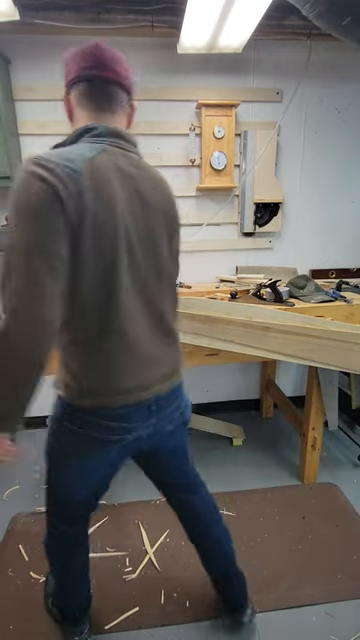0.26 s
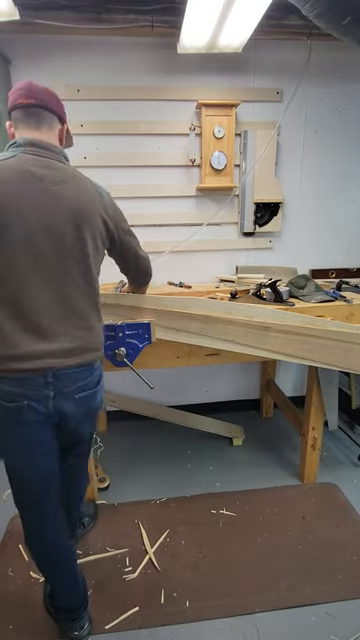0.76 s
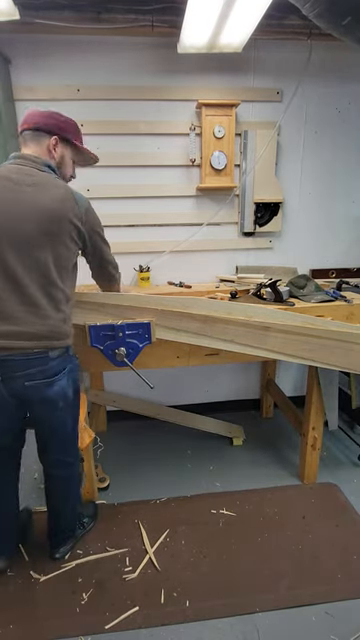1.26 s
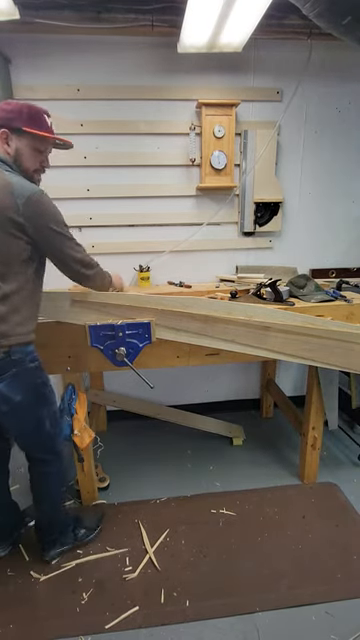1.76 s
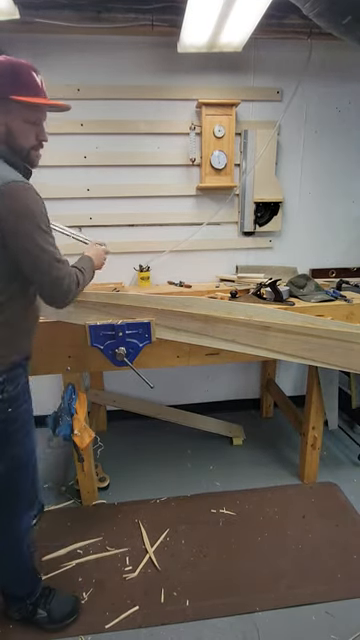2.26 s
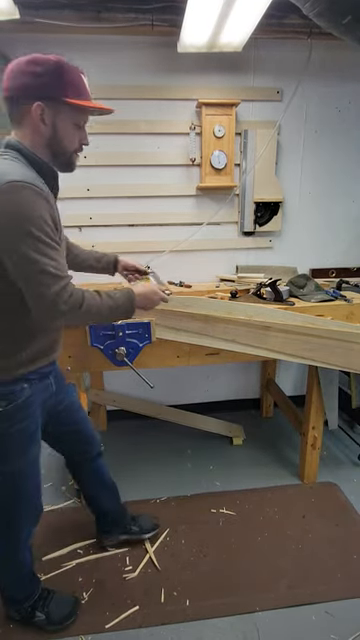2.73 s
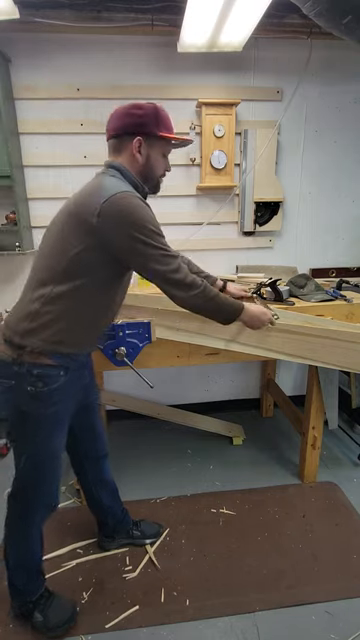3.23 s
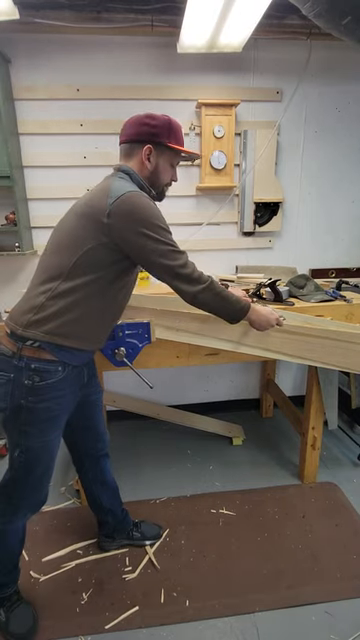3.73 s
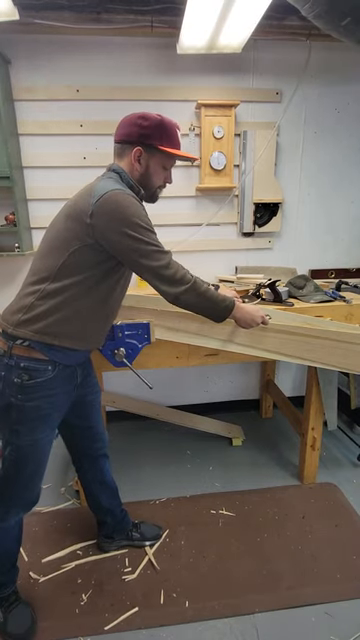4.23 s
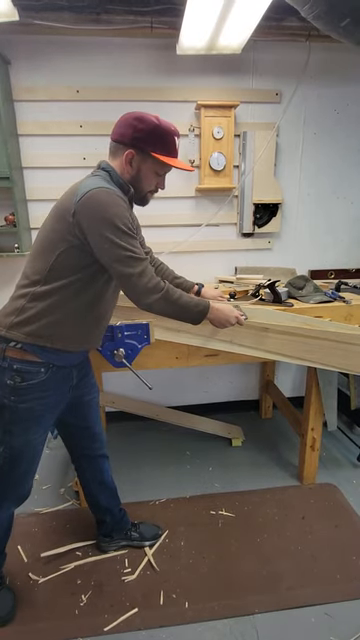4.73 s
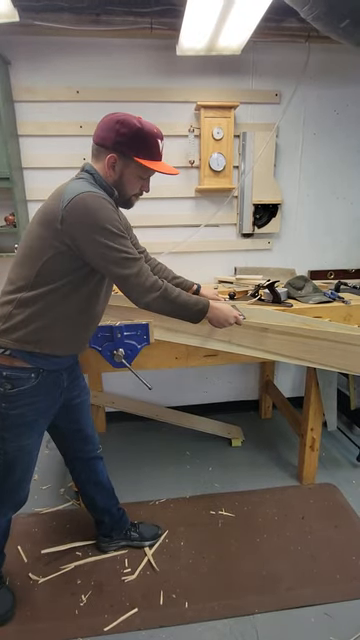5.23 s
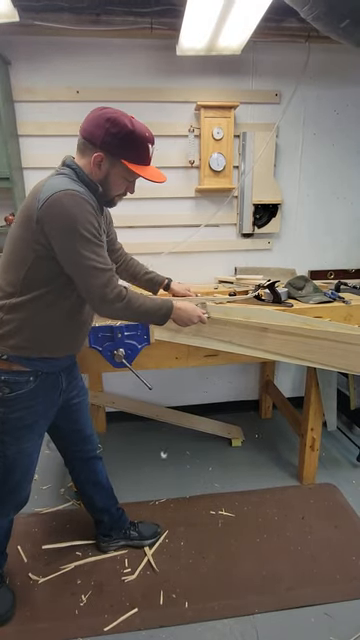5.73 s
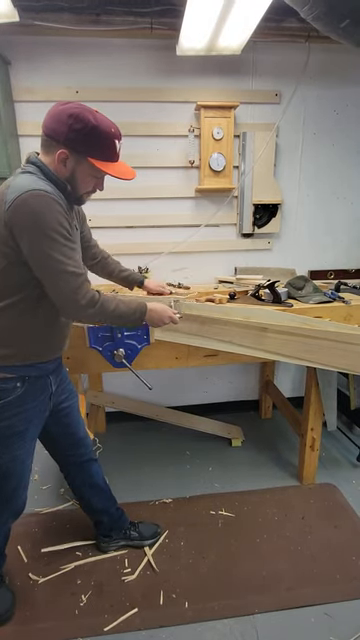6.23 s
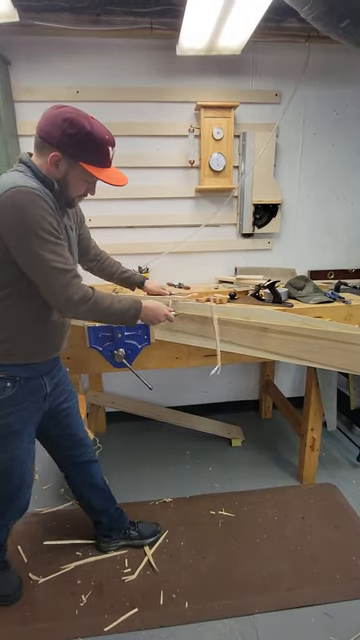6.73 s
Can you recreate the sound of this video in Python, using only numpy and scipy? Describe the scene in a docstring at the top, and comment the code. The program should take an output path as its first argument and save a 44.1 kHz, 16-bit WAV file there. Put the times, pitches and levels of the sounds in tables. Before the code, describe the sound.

A fan rushes faintly in a small workshop, heard from a couple of metres away. Shoes scuff on a mat and a tool knocks hard on the wooden bench. Then a blade shaves a board in seven quick, rasping strokes, the last four louder. Shavings split with crisp cracks and the board resonates, with faint rubbing and light taps as the blade goes back for each cut.

```python
"""A small woodshop, heard from a phone's two microphones a couple of metres off the bench: mostly room.
A woodworker steps up, picks up a drawknife with a knock and pulls seven strokes along a clamped board.
Each stroke is a dense run of tearing fibres with a few sharp splits, and the board drums under it.
Between strokes the blade slides back and is set down with a clack. A fan rushes and hums throughout."""
import sys
import numpy as np
from scipy import signal
from scipy.fft import rfft, irfft
from scipy.io import wavfile

SR = 44100
rng = np.random.default_rng(int(sys.argv[2]) if len(sys.argv) > 2 else 0)


def inscribe(sig):
    """Save sig as 16-bit PCM at rate SR to the path in sys.argv[1].

    A 1-D sig is mono; a 2-D sig holds one channel per row.
    Samples are clipped to [-1, 1] before scaling.
    """
    pcm = np.round(np.clip(np.atleast_2d(sig).T, -1, 1) * 32767)
    wavfile.write(sys.argv[1], SR, pcm.astype(np.int16))


N = 307818
T = np.arange(N) / SR

# Levels are relative within each table; the functions set the balance.
# pulls of the knife: t/s, attack/s, hold/s, tearing level/dB, swell over the hold/dB, drumming level/dB
KNIFE_PULLS = [(3.737, .17, 0.084, -38, 1, -40.5), (4.252, 0.027, 0.016, -30, -2.5, -33.5),
               (4.557, 0.084, 0.16, -30.5, 5.5, -38), (5.31, .017, 0.042, -19, -1.5, -24.5),
               (5.7, 0.032, 0.16, -23, 0, -29), (6.192, 0.051, 0.12, -17.5, -5.5, -26),
               (6.785, 0.095, 0.038, -21.5, 0, -27)]
# the blade rubs the wood between cuts: t/s, hold/s, level/dB, swell over the hold/dB
BLADE_SLIDES = [(3.382, .18, -50.5, 3.5), (3.702, 0.15, -45, 4.5), (4.098, 0.07, -50, -6),
                (4.419, 0.018, -42, -3.5), (4.935, .12, -45, -7), (5.138, 0.1, -43, 5),
                (5.577, 0.11, -39, -1.5), (5.965, .1, -39, -12.5), (6.133, 0.037, -39.5, 9.5),
                (6.484, 0.14, -44, -0.5), (6.667, .13, -41.5, 9)]
# the shaving splits ahead of the edge: t/s, level/dB
SHAVING_SPLITS = [(3.912, -26.5), (3.98, -24.5), (4.2798, -22), (4.3383, -22), (4.733, -25), (4.7682, -9.5),
                  (4.8122, -13.5), (5.3265, -17), (5.8247, -7), (6.2255, -11.5), (6.2716, -9),
                  (6.6565, -16), (6.8237, -17)]
# light clacks on the wood, most from setting the blade down: t/s, level/dB, treble cutoff/Hz
BLADE_TAPS = [(0.719, -56, 3970), (0.786, -37, 1750), (3.444, -39, 2020), (3.457, -37, 1440),
              (4.13, -49, 1180), (4.452, -41, 1810), (4.497, -43.5, 700), (4.975, -41, 1210),
              (5.218, -33, 700), (5.64, -37, 2200), (6.125, -44.5, 1500), (6.703, -36, 3240)]
# the tool knocks on the bench top: t/s, level/dB
BENCH_KNOCKS = [(1.468, -14), (1.474, -8)]
# weight shifts onto the floor, the board rocks in the vice: t/s, level/dB, f/Hz
LOW_BUMPS = [(3.497, -38, 81), (4.53, -43.5, 130), (5.211, -42.5, 141), (5.328, -35, 160),
             (5.595, -39, 138), (5.698, -34.5, 134.5), (6.281, -43, 125), (6.559, -46, 118)]
# shoes land and scuff on the mat: t/s, level/dB, fade/s, treble cutoff/Hz
FOOTFALLS = [(0.208, -41.5, .05, 2600), (0.719, -24.5, 0.0045, 1190), (0.759, -45, 0.0085, 1186),
             (2.179, -42, 0.0097, 2070), (2.869, -36.5, 0.0085, 2120), (2.924, -33, 0.0077, 1880)]
# light scrapes of shoes and tool: t/s, level/dB, fade/s
LIGHT_SCRAPES = [(0.222, -53.5, 0.043), (0.265, -53, 0.033), (0.37, -59, 0.057), (0.721, -43, 0.038),
                 (0.76, -43, 0.023), (1.031, -48, 0.0074), (1.428, -44.5, 0.07), (1.60, -57.5, 0.15),
                 (1.755, -51, 0.045), (1.778, -46, 0.025), (2.35, -49, 0.0069), (2.955, -60.5, 0.18)]

# modes of the clamped board and of the bench top: f/Hz, width/Hz, level/dB
BOARD_MODES = [(63, 8.3, -3), (125, 110, -4.5), (170, 30, -1.5), (204.1, 10.4, 6), (388.6, 29, -2),
               (498.5, 51, 0), (610, 119, 1), (682.3, 59, 4), (836, 34, -6.5), (1142.5, 132, 4.5),
               (1166, 120, 3), (1603, 40, -11.5), (2620, 390, -21)]
BENCH_MODES = [(125, 35, 2), (198, 23, 2), (241.8, 15, 5.5), (338, 42, 2), (457, 80, 3), (536, 77, 5.5),
               (690, 64, 5.5), (770, 47, 7.5), (1010, 430, -10.5), (1280, 92, 0), (2100, 63, -33)]
# spectrum of each source: f/Hz, level/dB
TEAR_SPECTRUM = [(50, -2.5), (300, -14.5), (900, 4), (1800, 2), (3200, 3.5), (4600, -1.5), (5900, 0.5),
                 (7500, -5), (10000, -5.5), (12500, -3.5), (16000, -5)]  # fibres tearing
SNAP_SPECTRUM = [(100, -11.5), (900, -3), (2500, 1), (4300, 2.5), (6500, 2.5), (9000, -8), (12500, -1.5),
                 (16000, 1.5)]  # the shaving splitting
BLADE_SPECTRUM = [(80, 3), (300, -2.5), (600, 3.5), (1500, -0.5), (3000, -2.5), (6500, -11), (9000, -20.5),
                  (16000, -19)]  # steel rubbing or tapping wood
KNOCK_SPECTRUM = [(60, -11), (120, -9), (350, 16.5), (800, -2), (1400, 2), (3000, -8.5), (6000, -23.5),
                  (9000, -38), (16000, -59)]  # the blow on the bench
SHOE_SPECTRUM = [(60, 2), (250, -30), (500, 0), (1500, -11.5), (4000, -6.5), (16000, -3)]  # soles on the mat
SCRAPE_SPECTRUM = [(100, -15), (700, 7.5), (2000, -0.5), (4000, 0.5), (7000, -8.5), (9000, -15),
                   (16000, -14.5)]  # shoes and tool scraping
FAN_SPECTRUM = [(40, -5.5), (65, 8), (110, -3.5), (200, 0.5), (300, -6.5), (400, -3.5), (560, -9),
                (750, -8), (1000, -15.5), (1600, -20), (2500, -20.5), (6500, -28), (9000, -42),
                (13000, -36), (16000, -42)]  # rushing air
# mains hum and fan tones: f/Hz, level/dB
HUM_TONES = [(242.2, -74.5), (387.6, -71.5), (479.1, -63.5), (511.4, -69.5), (786.0, -77.5)]

# reverberation of the shop: f/Hz, t60/s
SHOP_DECAY = [(80, 0.9), (250, 0.57), (800, 0.44), (2500, 0.38), (6000, 0.36), (10000, 0.22), (16000, 0.16)]
# how alike reflected sound is at the two microphone ports: f/Hz, correlation
PORT_CORRELATION = [(60, 0.96), (120, 0.89), (200, 1), (350, 0.38), (700, -0.26), (1300, -0.27),
                    (2500, 0.091)]
# response of each microphone port: f/Hz, level/dB
LEFT_MIC = [(60, -4), (400, -1.5), (1300, -2), (3000, -1), (6000, -1), (7600, 2), (9000, 3), (12000, 7),
            (15500, 5)]
RIGHT_MIC = [(60, -5.5), (400, 2), (2500, -0.5), (5500, 3.5), (7600, 5), (8500, -5), (10500, -6.5),
             (12300, 8), (15500, -3.5)]


def cutting(tear_db=2, drum_db=-1, drum_follow=0.79, grain_db=2, grain_per_s=110):
    """The edge tears fibres in uneven runs; the same jerks drum the board."""
    tear, drum = np.zeros(N), np.zeros(N)
    for s, attack_s, hold_s, db, swell_db, board_db in KNIFE_PULLS:
        pull = gesture(s, attack_s, hold_s, swell_db)
        tear += amp(db) * pull
        drum += amp(board_db) * pull ** drum_follow  # drumming varies less than the pull
    fine = unit(fibres(per_s=5000, spread_db=4) * amp(grain_db * walk(grain_per_s)))
    bundles = .45 * fibres(per_s=70, spread_db=2.5)  # now and then many fibres break at once
    jerks = unit(fine + bundles)
    drag = unit(fibres(per_s=1000, spread_db=1.5) + jerks)
    tearing = radiate(jerks * tear, colour(TEAR_SPECTRUM))
    drumming = radiate(drag * drum, resonances(BOARD_MODES))
    return amp(tear_db) * tearing + amp(drum_db) * drumming


def splitting(split_db=10, snap_s=0.00045, run_s=0.004, run_db=-14):
    """The shaving snaps, then the crack runs a little way along the grain."""
    force = np.zeros(N)
    for s, db in SHAVING_SPLITS:
        add(force, s, amp(db + split_db) * (burst(snap_s) + amp(run_db) * burst(run_s)))
    return radiate(force, colour(SNAP_SPECTRUM))


def sliding(rub_db=-1, drum_db=-7, attack_s=0.033):
    """The blade rubs lightly on its way back and stirs the board."""
    pressure = sum(amp(db) * gesture(s, attack_s, hold_s, swell_db)
                   for s, hold_s, db, swell_db in BLADE_SLIDES)
    friction = fibres(per_s=6300, spread_db=5) * pressure
    rubbing = radiate(friction, colour(BLADE_SPECTRUM))
    return amp(rub_db) * rubbing + amp(drum_db) * radiate(friction, resonances(BOARD_MODES))


def tapping(tap_db=9, ring_db=-2, low_cut_hz=380):
    """Steel lands on wood, clacks and rings the board."""
    force = np.zeros(N)
    for s, db, hz in BLADE_TAPS:
        add(force, s, amp(db + tap_db) * soften(burst(fade_s=.006), hz))
    force = low_cut(force, low_cut_hz, order=2)  # too light to move the low modes
    clack = 2 * radiate(force, colour(BLADE_SPECTRUM))
    return clack + amp(ring_db) * radiate(force, resonances(BOARD_MODES))


def knocking(ring_db=3, rattle_s=0.0069):
    """A heavy, rattling blow in two contacts rings the well-damped bench top."""
    force = np.zeros(N)
    for s, db in BENCH_KNOCKS:
        add(force, s, amp(db) * burst(rattle_s))
    crack = radiate(force, colour(KNOCK_SPECTRUM))
    return crack + amp(ring_db) * radiate(force, resonances(BENCH_MODES))


def bumping(bump_db=4, rise_s=.011):
    """Weight shifts and the board rocks: low thumps that swell and die within a few cycles."""
    thumps, t = np.zeros(N), T[:SR // 2]
    swell = t / rise_s * np.exp(1 - t / rise_s)
    for s, db, hz in LOW_BUMPS:
        add(thumps, s, amp(db + bump_db) * swell * np.sin(2 * np.pi * hz * t))
    return thumps


def footwork(step_db=7, scrape_db=4):
    """Footfalls on the mat and gritty scrapes while the tool is fetched."""
    steps, scrapes = np.zeros(N), np.zeros(N)
    for s, db, fade_s, hz in FOOTFALLS:
        add(steps, s, amp(db + step_db) * soften(burst(fade_s), hz))
    for s, db, fade_s in LIGHT_SCRAPES:
        add(scrapes, s, amp(db + scrape_db) * burst(fade_s))
    grit = fibres(per_s=6000, spread_db=3)
    return radiate(steps, colour(SHOE_SPECTRUM)) + radiate(scrapes * grit, colour(SCRAPE_SPECTRUM))


def fan(air_db=-56, wander_hz=0.73, waver_db=0.1, right_bias_db=3):
    """A steady rush of air from all sides, with faint wavering tones a little to the right."""
    spectra, hz = diffuse(N)
    air = unit(irfft(spectra * amp(across(FAN_SPECTRUM, hz)), N))
    hum = np.zeros(N)
    for tone_hz, db in HUM_TONES:
        gain = amp(db - waver_db * walk(per_s=5))
        pitch_hz = tone_hz + wander_hz * walk(per_s=4.97)
        hum += gain * unit(np.sin(2 * np.pi * np.cumsum(pitch_hz) / SR))
    pan = amp(np.array([[-right_bias_db], [right_bias_db]]) / 2)
    return amp(air_db) * air + pan * hum


def shop(work, spots=5, spot_s=.03, direct_db=-8, room_db=-1.3, left_lag_samples=5):
    """Weak direct sound under the room; blade and body keep moving, so the reflections keep changing."""
    left = np.pad(work, (left_lag_samples, 0))[:N]
    at_mics = amp(direct_db) * np.array([left, work])
    for spot in range(spots):
        away = np.abs((T / spot_s - spot) % spots - spots / 2)
        share = work * np.sqrt(np.maximum(1 - away, 0))  # neighbouring spots hand over at equal power
        at_mics += amp(room_db) * np.array([through(share, side) for side in reflections()])
    return at_mics


def reflections(size=32768, early_db=4, early_s=0.01, gap_s=.001):
    """Stereo room response for one spot: close reflections off bench and wall, then the tail."""
    spectra, hz = diffuse(size)
    t, tail = T[:size], 0
    for band_hz, t60 in SHOP_DECAY:
        band = across([(f, f == band_hz) for f, _ in SHOP_DECAY], hz)
        tail += irfft(spectra * band, size) * amp(-60 * t / t60)
    early_lift = 1 + amp(early_db) * np.exp(-t / early_s)
    return unit(tail * (t > gap_s) * early_lift) / np.sqrt(size)


def diffuse(size):
    """Spectra of sound from all sides at two close ports: alike in the bass, unrelated in the treble."""
    hz = np.fft.rfftfreq(size, 1 / SR)
    alike = across(PORT_CORRELATION, hz)
    mid, side = rfft(rng.standard_normal((2, size)))
    mid, side = mid * np.sqrt(1 + alike), side * np.sqrt(1 - alike)
    return np.array([mid + side, mid - side]) / np.sqrt(2), hz


def gesture(start_s, attack_s, hold_s, swell_db, bite_db=19, release_db_per_s=245):
    """Gain along one movement: the blade sinks in, the pressure swells or sags, the hands ease off."""
    t = T - start_s
    touch = np.clip(1 + t / .01, 0, 1)  # fades in over the 10 ms before the start
    bite = np.clip(t / attack_s, 0, 1) - 1
    held = np.clip((t - attack_s) / hold_s, 0, 1)
    released_s = np.maximum(t - attack_s - hold_s, 0)
    return touch * amp(bite_db * bite + swell_db * held - release_db_per_s * released_s)


def fibres(per_s, spread_db):
    """Dense clicks of uneven size, one for each fibre that gives way."""
    breaks = rng.random(N) < per_s / SR
    size = amp(spread_db * np.minimum(rng.exponential(size=N), 4))
    return unit(breaks * size * rng.choice([-1, 1], N))


def burst(fade_s):
    """A contact: many tiny impacts that die away."""
    t = T[:SR // 2]
    return rng.standard_normal(len(t)) * np.exp(-t / fade_s)


def resonances(modes):
    """Impulse response of wood: one damped sine a mode, alternating in sign."""
    t = T[:SR // 2]
    return sum((-1) ** k * amp(db) * width * np.exp(-np.pi * width * t) * np.sin(2 * np.pi * hz * t)
               for k, (hz, width, db) in enumerate(modes))


def colour(spectrum, size=4096):
    """Causal response with the given spectrum, from the folded cepstrum."""
    gain = amp(across(spectrum, np.fft.rfftfreq(size, 1 / SR)))
    cepstrum = irfft(np.log(gain))
    cepstrum[1:size // 2] *= 2
    cepstrum[size // 2 + 1:] = 0
    return irfft(np.exp(rfft(cepstrum)))


def radiate(force, response):
    """Pass a force through a response of unit energy."""
    return through(force, response / np.linalg.norm(response))


def through(x, response):
    """Convolve and keep the length of the scene."""
    return signal.fftconvolve(x, response)[:N]


def soften(x, hz):
    """A soft contact loses its treble."""
    return signal.sosfilt(signal.butter(2, hz, fs=SR, output="sos"), x)


def low_cut(x, hz, order):
    """Roll off the bass."""
    return signal.sosfilt(signal.butter(order, hz, "highpass", fs=SR, output="sos"), x)


def walk(per_s):
    """Smooth random wander of spread near 1."""
    knots = rng.standard_normal(int(N / SR * per_s) + 2)
    return np.interp(T * per_s, np.arange(len(knots)), knots)


def across(points, hz):
    """Read a table of f/Hz, value on a log-frequency axis."""
    f, value = np.transpose(points)
    return np.interp(np.log(hz + 1), np.log(f), value)


def add(track, s, sound):
    """Mix a sound into the track at time s."""
    start = int(s * SR)
    track[start:start + len(sound)] += sound[:N - start]


def amp(db):
    """Decibels to gain."""
    return 10 ** (np.asarray(db) / 20)


def unit(x):
    """Scale to rms 1."""
    return x / np.sqrt(np.mean(x ** 2))


def scene():
    """The work at the bench, heard across the shop over the fan."""
    work = cutting() + splitting() + sliding() + tapping() + knocking() + bumping() + footwork()
    return shop(work) + fan()


def record(dry, low_cut_hz=46, top_hz=15900):
    """Each microphone port of the phone has its own colour; rumble and the very top are cut."""
    heard = np.array([through(side, colour(mic)) for side, mic in zip(dry, (LEFT_MIC, RIGHT_MIC))])
    heard = low_cut(heard, low_cut_hz, order=5)
    return signal.sosfilt(signal.ellip(10, .2, 80, top_hz, fs=SR, output="sos"), heard)


dry = scene()
out = record(dry)
inscribe(out)
```